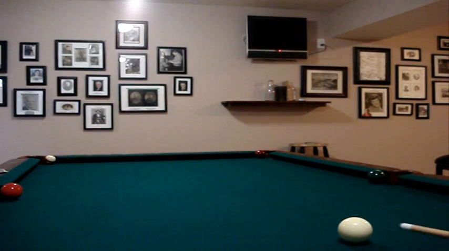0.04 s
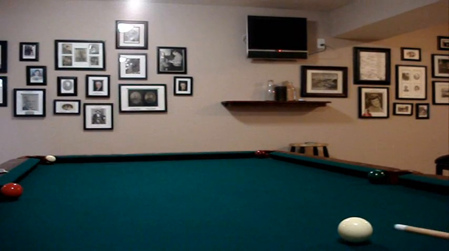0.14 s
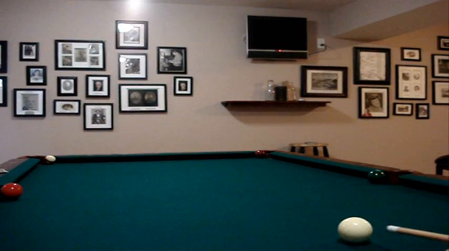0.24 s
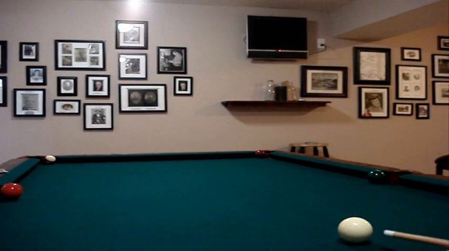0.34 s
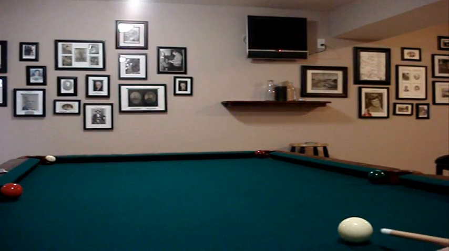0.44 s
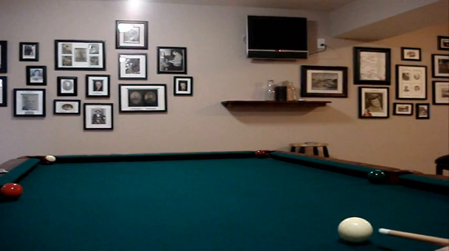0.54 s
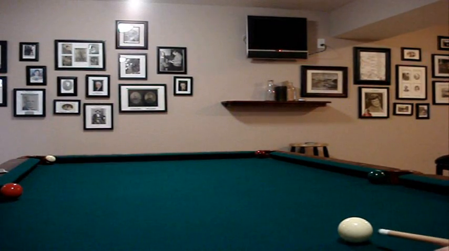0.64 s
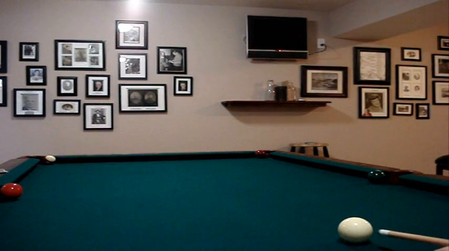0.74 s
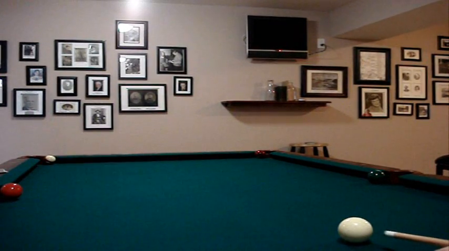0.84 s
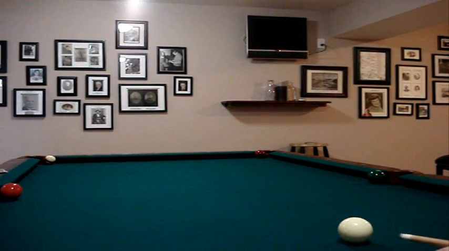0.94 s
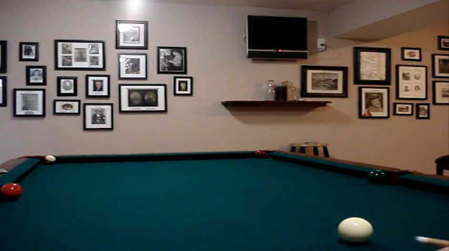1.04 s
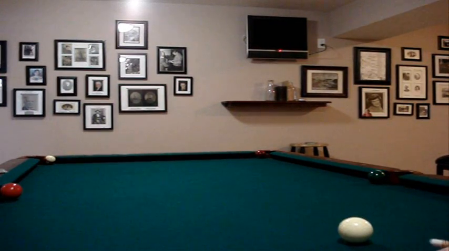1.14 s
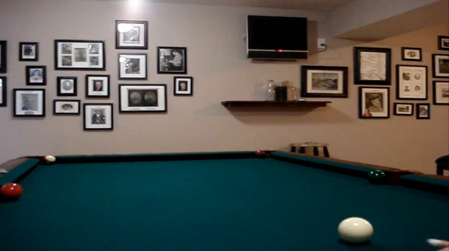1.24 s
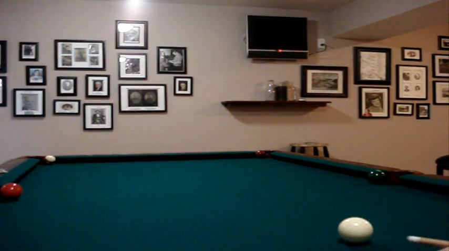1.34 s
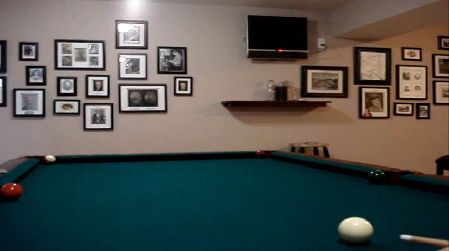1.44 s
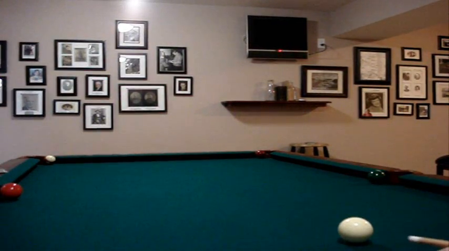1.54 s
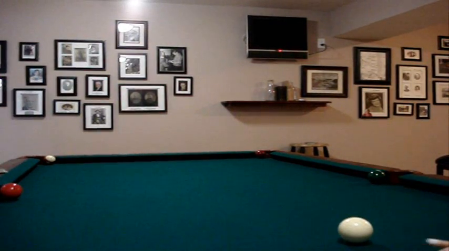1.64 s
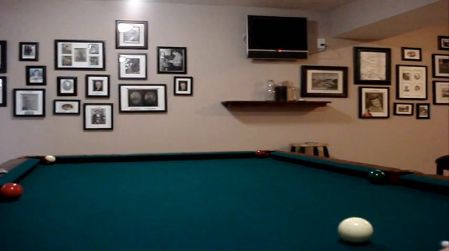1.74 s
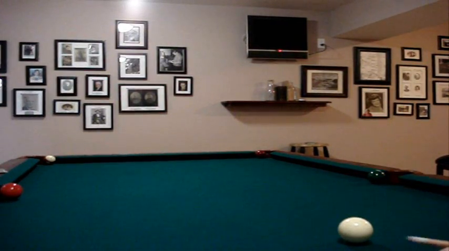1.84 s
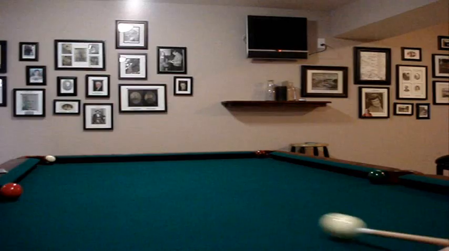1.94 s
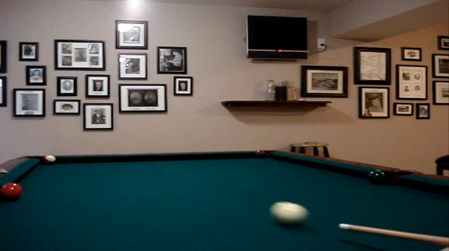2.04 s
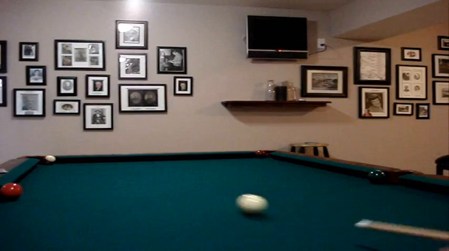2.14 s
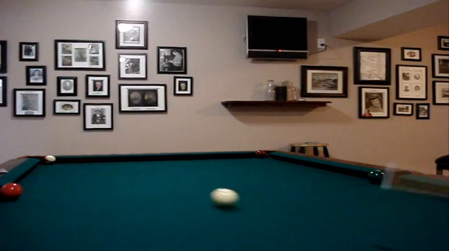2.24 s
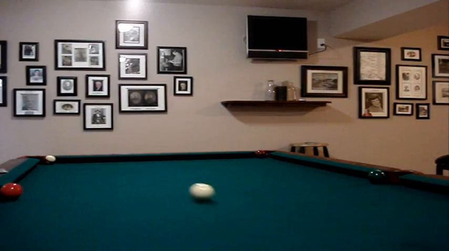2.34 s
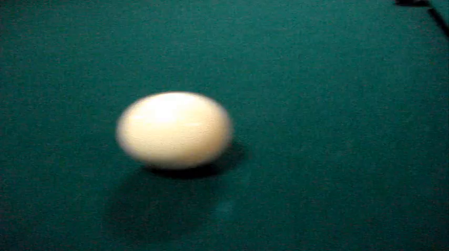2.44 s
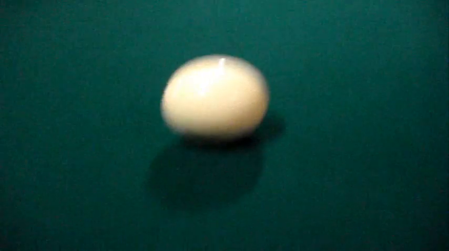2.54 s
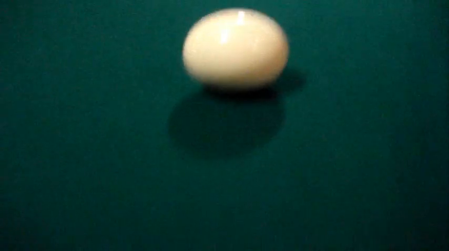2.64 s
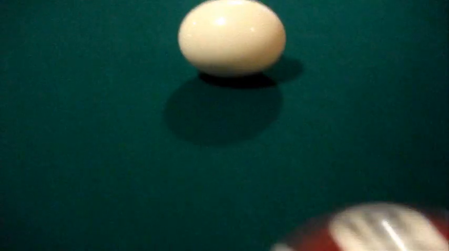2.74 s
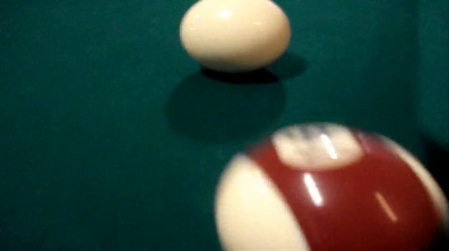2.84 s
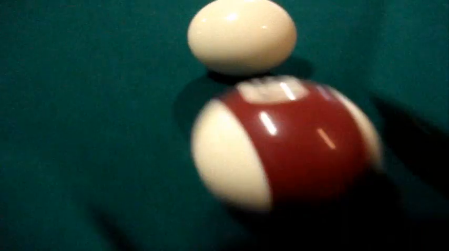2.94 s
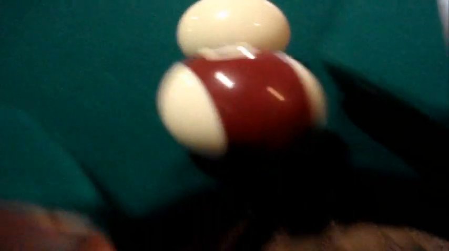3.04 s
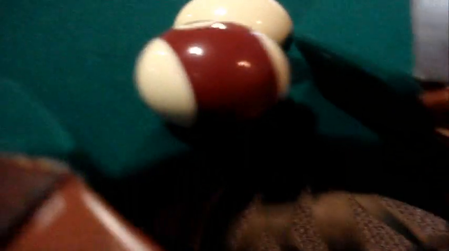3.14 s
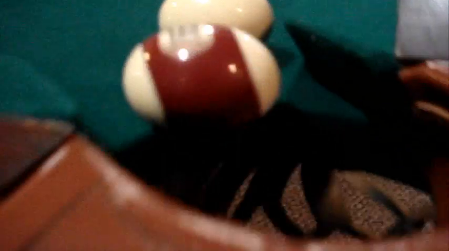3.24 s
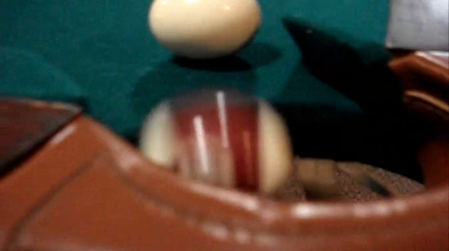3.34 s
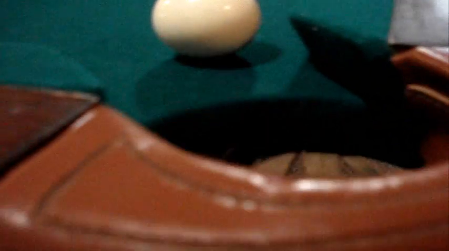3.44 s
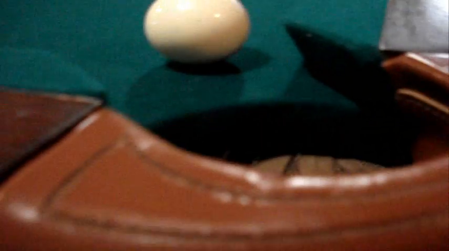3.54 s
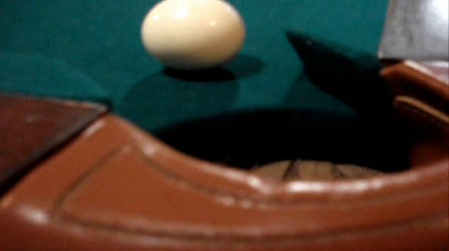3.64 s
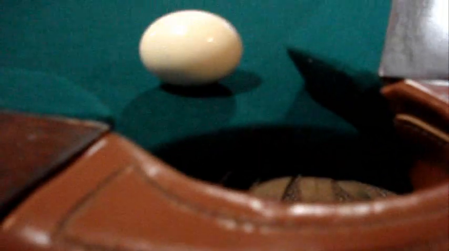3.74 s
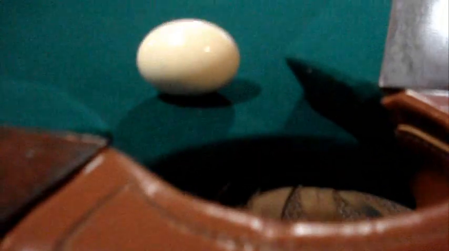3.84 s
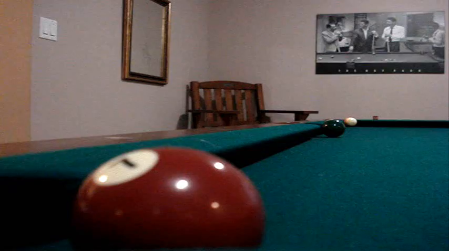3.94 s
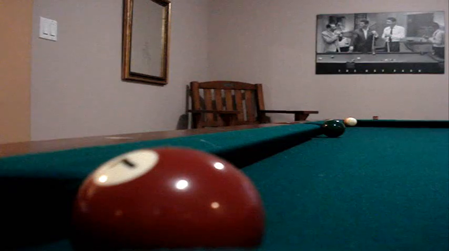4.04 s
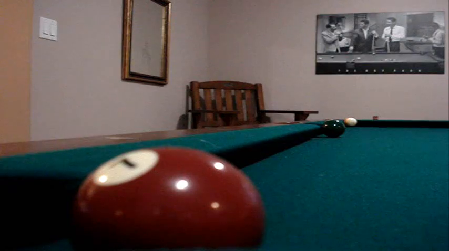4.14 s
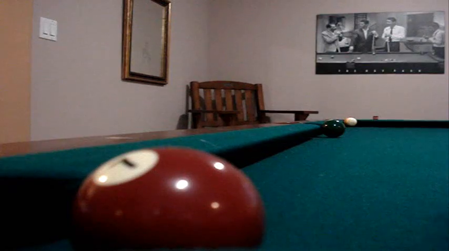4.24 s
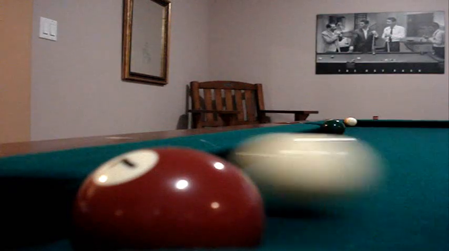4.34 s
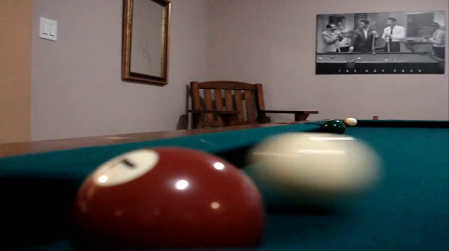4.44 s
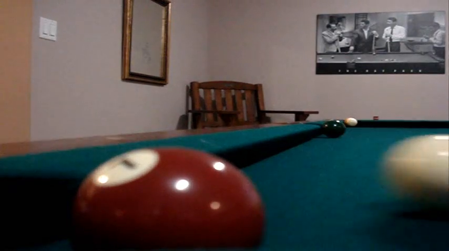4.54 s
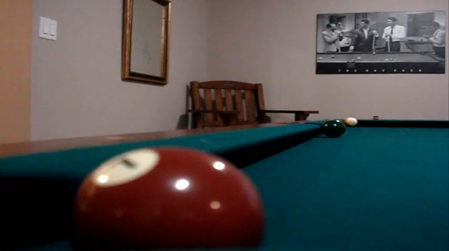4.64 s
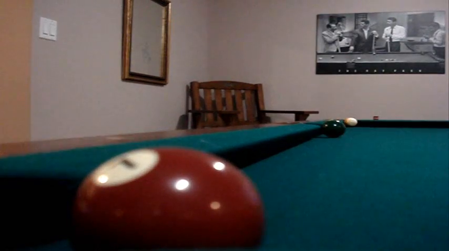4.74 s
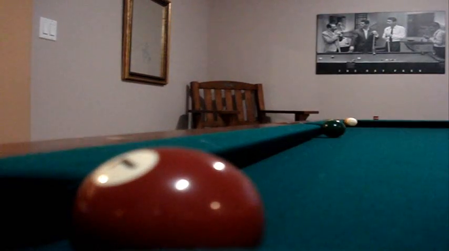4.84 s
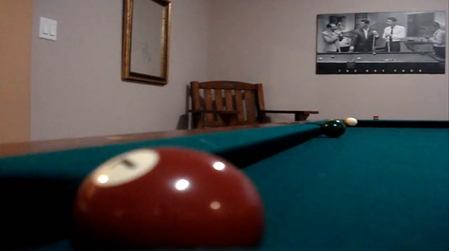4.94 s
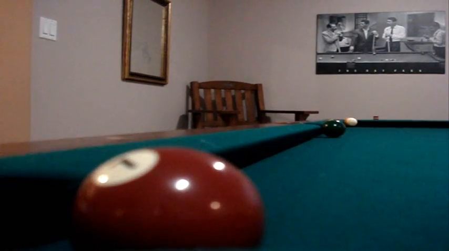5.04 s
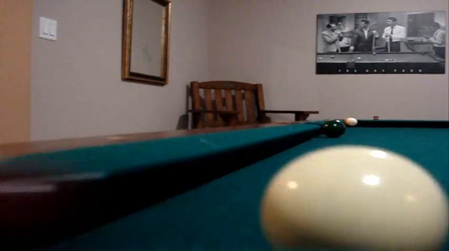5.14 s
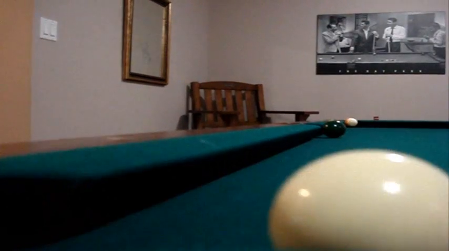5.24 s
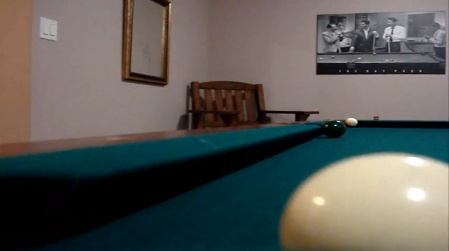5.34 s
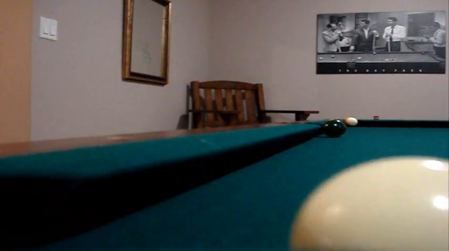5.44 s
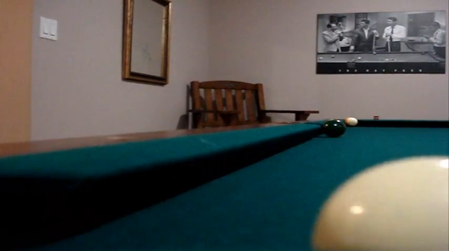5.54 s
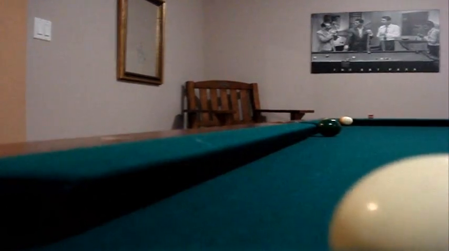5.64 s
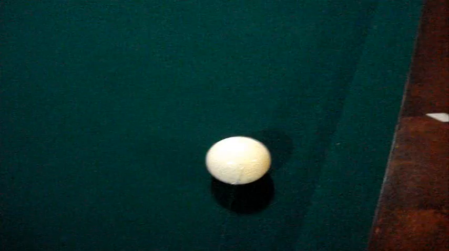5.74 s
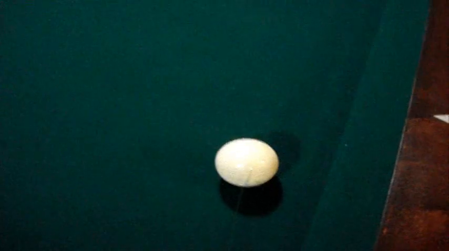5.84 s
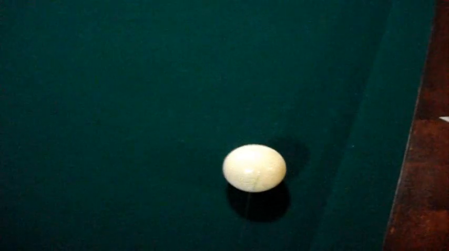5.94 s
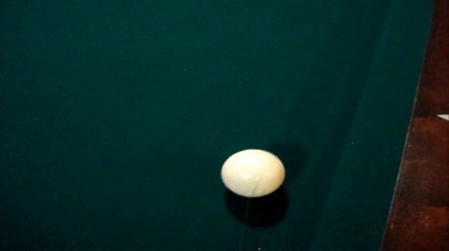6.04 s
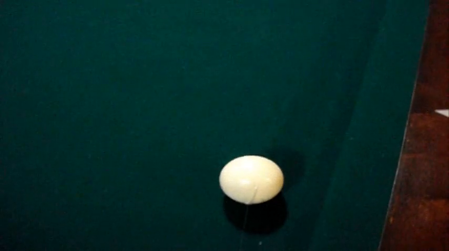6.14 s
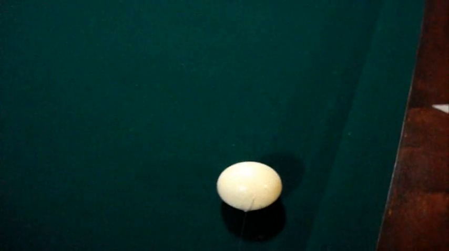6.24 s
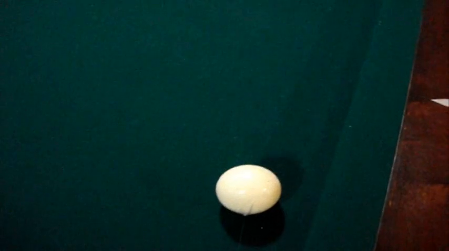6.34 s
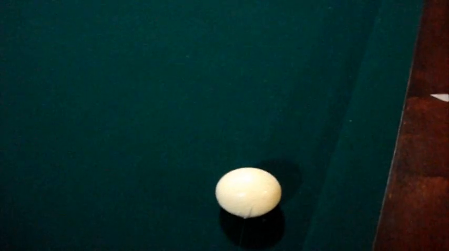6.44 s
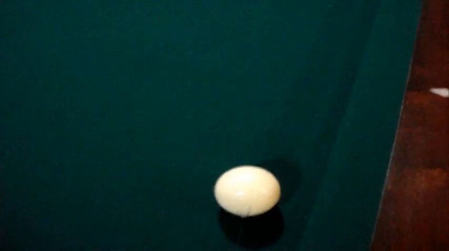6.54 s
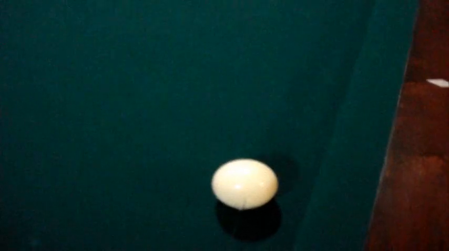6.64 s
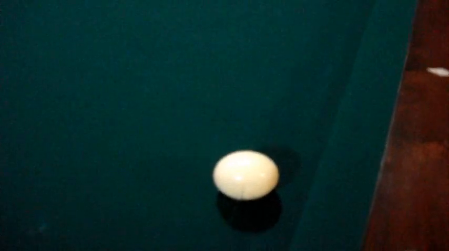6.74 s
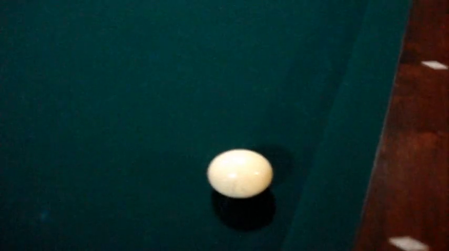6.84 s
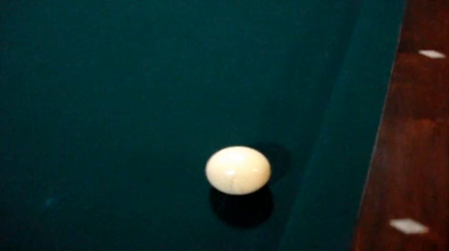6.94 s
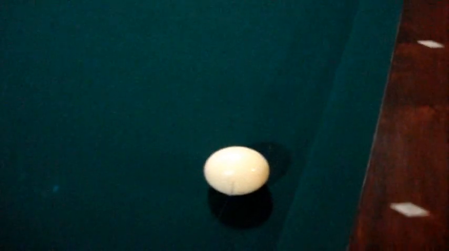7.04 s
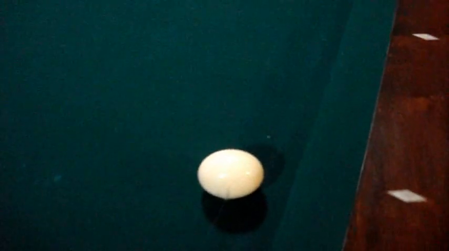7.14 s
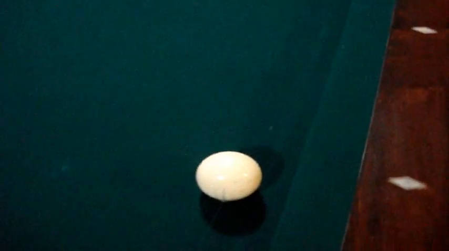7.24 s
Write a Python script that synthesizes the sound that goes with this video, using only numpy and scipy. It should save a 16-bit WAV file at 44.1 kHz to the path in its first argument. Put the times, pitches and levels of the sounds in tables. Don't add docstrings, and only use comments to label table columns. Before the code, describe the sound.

Constant soft camera hiss, low hum and thin whines fill a small room, with very faint button ticks at 0.2 and 1.4 s. At 2.05 s a cue strikes a ball with a hard woody knock, table boom and short echo; faint rolling follows. A brief dropout at 2.54 s changes the scene, with a small click at 2.8. At 3.27 balls clack loudly, then at 3.54 a ball drops into a leather pocket, rattling and chattering faster until 3.85. Close, thumping plastic handling snaps cluster at 3.86-3.97, with another cut at 4.04 and a click at 4.2. A softer distant cue hit comes at 4.5, with low rumble and dull cushion bumps near 5. Loud clacks and pocket knocks burst at 5.24-5.43. Sharp microphone clicks crowd 5.7-5.83. From about 6.05 to the end a ball rolls close by on crackling cloth, strongest near 6.6, its hollow whirring tone sinking.

```python
import sys
import numpy as np
from scipy import signal
from scipy.fft import rfft, irfft
from scipy.io import wavfile
from scipy.ndimage import uniform_filter1d, minimum_filter1d

SR = 44100
rng = np.random.default_rng(int(sys.argv[2]) if len(sys.argv) > 2 else 0)


def digitize_waveform(pressure):
    field = np.atleast_2d(pressure).T
    bounded = np.clip(field, -1, 1)
    quanta = np.round(bounded * 32767).astype(np.int16)
    wavfile.write(sys.argv[1], SR, quanta)


def convert_level_to_amplitude(level_db):
    exponent = np.asarray(level_db, float) / 20
    return 10 ** exponent


N = 321930

# frequency in Hz, density in dB per Hz.
FLOOR_SPECTRUM = [(15, -41), (30, -17), (74, -12.5), (119, -10.5), (200, -6.5), (340, -5.5), (640, -9),
                  (1800, -15.5), (4000, -20), (7900, -25), (9950, -29.5), (10100, -37.5), (12000, -37.5),
                  (15400, -33)]
# frequency in Hz, level in dB.
WHINES = [(4000, -66), (5001, -74), (6998, -91), (7590, -102), (7860, -81), (7892, -66), (8000, -75),
          (15003, -92)]
# start in seconds, level in dB.
HUM_LEVELS = [(0, -62.5), (2.54, -54), (3.54, -59), (4.04, -63.5), (5.6, -73)]
SHOT_GAPS = [2.5415, 4.042]

# start in seconds, peak in dB, shell pitch in Hz.
BUTTON_TICKS = [
    (.22, -35.5, 4500),
    (.32, -40, 4500),
    (1.41, -40, 7140),
    (2.77, -19, 2940),
    (4.194, -24.5, 3950),
]
LIGHT_TOUCHES = [(3.8589, -16.5, 2700), (5.6965, -6, 4230), (5.7274, -21, 3270), (5.7407, -22, 2290),
                 (5.749, -25, 2600), (5.7626, -22, 2500), (5.7706, -15, 2920), (5.783, -11, 2400),
                 (5.790, -6.5, 2780), (5.8248, -25, 2550), (5.8313, -10, 2470)]
FIRM_TOUCHES = [
    (3.89, -18, 2300),
    (5.775, -7, 2400),
]
HARD_TOUCHES = [
    (3.895, -8, 2610),
    (3.933, -4.5, 2360),
    (3.9692, -12.5, 2630),
]
RINGING_TOUCHES = [
    (3.859, -28, 1380),
    (3.876, -19.5, 1370),
    (3.9349, -15.5, 2480),
    (5.7002, -6.5, 2610),
]
RUSTLES = [
    (3.863, -25, 2600),
    (3.9, -25, 2400),
    (5.7968, -23.5, 2540),
]
# thump in dB, ring time in seconds, pure share of the ring, click in dB.
TOUCH_VOICES = [
    (-72, 0.02, 0.16, -15),
    (-52, 0.016, 0.53, -12),
    (-36, .017, 0.65, 2),
    (-23, 0.021, 0.24, 3.5),
    (-58, 0.018, 1.8, -40),
    (-60, .06, .05, -40),
]

# start in seconds, peak in dB, ring in Hz, ring length in cycles, room send in dB.
CUE_BLOWS = [
    (2.0478, -5, 645, 1.84, -26.5),
    (4.5037, -31, 446, 5.1, -16),
]
# frequency in Hz, level in dB, decay t60 in seconds.
CUE_SHAFT = [(1800, -22, 0.13), (2116, -25.5, .1), (1010, -20, 0.082)]
# frequency in Hz, level in dB, decay t60 in seconds.
TABLE_SLATE = [(150.2, -17.5, 0.6), (256, -10.5, 0.15), (536, 1.5, 0.057)]
# frequency in Hz, decay t60 in seconds.
ROOM_DECAY = [(100, 0.37), (400, 0.29), (1500, 0.27), (4000, 0.26), (8000, .18)]

# start in seconds, end in seconds, rumble in dB, swish in dB.
FAR_RUNS = [
    (2.197, 2.54, -57, -60),
    (2.547, 3.268, -59.5, -60),
    (4.29, 5.24, -53, -62),
]
# time in seconds, rumble in dB, swish in dB.
CUSHION_BUMPS = [
    (2.585, -53, -53),
    (4.85, -56, -75),
    (4.98, -44, -66),
    (5.13, -46, -64),
]

# start in seconds, peak in dB, ring in Hz, room send in dB.
BALL_CLACKS = [
    (3.2674, 1, 1800, -32),
    (3.2688, -4, 1910, -70),
    (5.041, -30, 1370, -41),
    (5.237, 2, 2400, -18),
    (5.367, -2.5, 1200, -26.5),
    (5.386, 3.5, 2080, -31),
    (5.407, 3.5, 2280, -30),
    (5.432, -6.5, 1810, -28.5),
    (6.085, -32, 1650, -21),
]

# start in seconds, level in dB, length in seconds, sag in dB per second.
POCKET_SPELLS = [
    [(3.541, -7.5, 0.034, 135), (3.58, -19, 0.145, 103)],
    [(5.236, -8, 0.039, 54), (5.283, -6.5, 0.1, 60), (5.41, -26.5, 0.2, 116)],
]
# frequency in Hz, density in dB per Hz.
POCKET_SPECTRA = [
    [(35, -47), (60, -11.5), (606, -18.5), (729, -3.5), (952, -12), (1520, -5.5), (1690, -1.5), (3320, -4),
     (4700, -17), (8000, -32), (10400, -63), (17600, -120)],
    [(35, -15), (60, -12), (302, -14.5), (387, -10), (582, -8), (932, -6.5), (1190, 0.5), (2300, -1),
     (3100, -6.5), (4300, -20), (8000, -36), (10400, -68), (17600, -120)],
]
POCKET_SINK = (0.27, 0.16)
POCKET_KNOCKS = (3000, 9000)
# start in seconds, peak in dB, ring in Hz.
POCKET_RATTLE = [
    (3.5419, 6, 1890),
    (3.609, -10, 1510),
    (3.637, -4, 1790),
    (3.683, -9.5, 1580),
    (3.696, -10, 1650),
    (3.7151, -21, 1470),
    (3.727, -18, 1600),
    (3.737, -24, 1460),
]
# start in seconds, first gap in seconds, last gap in seconds, ring in Hz.
POCKET_CHATTER = (3.7475, .0051, .00236, 1600)
# frequency in Hz, level in dB, decay t60 in seconds.
LEATHER_CUP = [(794, -18, 0.12), (410, -29, 0.048)]

# time in seconds, cloth hiss in dB.
ROLL_NEARNESS = [(5.98, -65), (6.1, -46.5), (6.22, -39.5), (6.52, -34.5), (6.68, -32.5), (6.87, -39),
                 (7.3, -38)]
# frequency in Hz, density in dB per Hz.
CLOTH_SPECTRUM = [(1120, -17.5), (1900, -2), (2500, -3), (3190, -1.5), (3550, -6), (3990, -2.5), (4910, 2),
                  (5690, -8.5), (6170, -7), (8530, -26), (9500, -23), (12400, -27), (20900, -120)]
# time in seconds, extra level in dB.
ROUGH_PATCHES = [
    (6.096, 4.5),
    (6.222, 2),
    (6.568, 4),
    (6.67, 5.0),
    (7.112, 3.5),
    (7.24, 1.5),
]

CLOCK_HZ = (12000, 8000)
CLOCK_FOLD_DB = (-23.5, -31.5)


def rms_one(x):
    return x / np.sqrt(np.mean(x ** 2) + 1e-20)


def colour(x, points):
    hz = np.arange(len(x) // 2 + 1) * SR / len(x) + 1
    point_hz, point_db = np.transpose(points)
    gain = convert_level_to_amplitude(np.interp(np.log(hz), np.log(point_hz), point_db))
    return irfft(rfft(x) * gain, len(x))


def band(x, low_hz, high_hz):
    return signal.sosfilt(signal.butter(2, [low_hz, high_hz], "band", fs=SR, output="sos"), x)


def smooth(x, order, hz):
    return signal.sosfilt(signal.butter(order, hz, fs=SR, output="sos"), x)


def drift(rate):
    knots = rng.standard_normal(400)
    return np.interp(np.arange(N) / SR * rate, np.arange(400), knots)


def bell(s, width_s):
    return np.exp(-((np.arange(N) / SR - s) / width_s) ** 2)


def add(out, s, sound):
    at = round(s * SR)
    out[at:at + len(sound)] += sound[:N - at]


def modes(table):
    t = np.arange(12000) / SR
    return sum(convert_level_to_amplitude(db - 60 * t / t60) * np.sin(2 * np.pi * hz * t) for hz, db, t60 in table)


def floor():
    t = np.arange(N) / SR
    hiss = rms_one(colour(rng.standard_normal(N), FLOOR_SPECTRUM))
    hiss = hiss * convert_level_to_amplitude(-50.5 + 0.071 * drift(11.0))
    whine = sum(convert_level_to_amplitude(db - 7) * np.sin(2 * np.pi * hz * t) for hz, db in WHINES)
    start_s, place_db = np.transpose(HUM_LEVELS)
    hum_db = uniform_filter1d(place_db[np.searchsorted(start_s[1:], t)], size=800)
    hum = convert_level_to_amplitude(hum_db + 2.0 * drift(4.17)) * np.sin(2 * np.pi * 122 * t)
    return hiss + whine + hum


def buttons():
    out, t = np.zeros(N), np.arange(2600) / SR
    push = t / 0.0021 * np.exp(1 - t / 0.0015)
    push = push - 0.1 * t / 0.045 * np.exp(1 - t / 0.032)
    click = 1.9 * np.sin(2 * np.pi * 3200 * t) * np.exp(-t / 0.000073)
    kinds = (BUTTON_TICKS, LIGHT_TOUCHES, FIRM_TOUCHES, HARD_TOUCHES, RINGING_TOUCHES, RUSTLES)
    for rows, (thump_db, ring_s, pure, click_db) in zip(kinds, TOUCH_VOICES):
        tame = max(pure, 1)
        for s, db, hz in rows:
            noise = rng.standard_normal((2, 2600))
            snap = band(noise[0], 450, 7500)
            snap = snap * (0.7 * np.exp(-t / 0.0006) + 0.15 * np.exp(-t / 0.003))
            shell = pure * np.sin(2 * np.pi * hz * t) + band(noise[1], 0.72 * hz, 1.56 * hz)
            shell = 0.74 / tame * shell * convert_level_to_amplitude(-60 * t / ring_s)
            body = (snap / tame ** 2 + shell) * (1 - np.exp(-t / 0.0003))
            touch = convert_level_to_amplitude(db) * (body + convert_level_to_amplitude(click_db) * click) + convert_level_to_amplitude(thump_db + 2.5) * push
            add(out, s + 0.00079, touch)
    return out


def knock(hz, cycles, bright_db, push_db):
    t = np.arange(1024) / SR
    swell = 1 - np.exp(-(t * hz * 2.25) ** 2)
    decay = np.exp(-np.log(1000) * t * hz / cycles)
    ring = -np.sin(2 * np.pi * hz * t - 1.2) * swell * decay
    tick = band(rng.standard_normal(1024) * np.exp(-t / 0.0077), 1500, 3600)
    push = band(t / 0.00026 * np.exp(1 - t / 0.00028), 106, 2960)
    return ring / np.abs(ring).max() + convert_level_to_amplitude(bright_db) * tick - convert_level_to_amplitude(push_db) * push


def strike(near, far, s, db, hz, cycles, room_db, bright_db, push_db=-17, low_hz=30):
    direct = knock(hz, cycles, bright_db, push_db)
    add(near, s + 0.0007, convert_level_to_amplitude(db) * band(direct, low_hz, 16000))
    blunt = knock(hz, 0.52 * cycles, bright_db + 4.0, -44)
    add(far, s, convert_level_to_amplitude(db + room_db + 5.5) * band(blunt, hz / 3.9, 3000))


def cue_blows():
    near, far = np.zeros(N), np.zeros(N)
    for (s, db, hz, cycles, room_db), slate_db in zip(CUE_BLOWS, (-12, 0.1)):
        strike(near, far, s, db, hz, cycles, room_db, bright_db=-17, push_db=-50, low_hz=170)
        add(near, s, convert_level_to_amplitude(db + slate_db) * band(modes(TABLE_SLATE), 120, 4400))
    t = np.arange(12000) / SR
    beating = 1 + 0.37 * np.cos(2 * np.pi * 65 * t)
    add(near, CUE_BLOWS[0][0] + 0.000903, modes(CUE_SHAFT) * beating)
    return near, far


def room(x):
    t, tail = np.arange(SR) / SR, 0
    echoes = rng.standard_normal(SR) * (rng.random(SR) < 0.03 + 3.0 * t)
    echoes = echoes * np.clip((t - 0.004) / 0.0064, 0, 1)
    decay_hz, decay_s = np.transpose(ROOM_DECAY)
    edges = 70 * 2 ** np.arange(0, 7.6, 0.5)
    for low, high in zip(edges, edges[1:]):
        t60 = np.interp(np.log(low), np.log(decay_hz), decay_s)
        tail = tail + min(low / 200, 1) * band(echoes, low, high) * convert_level_to_amplitude(-60 * t / t60)
    return signal.fftconvolve(x, tail / np.sqrt(np.sum(tail ** 2)) * 10)[:N]


def rumble():
    low = rms_one(band(rng.standard_normal(N), 81, 270))
    swish = rms_one(band(rng.standard_normal(N), 600, 3100))
    t, out = np.arange(N) / SR, np.zeros(N)
    for start, end, low_db, swish_db in FAR_RUNS:
        out += ((t > start) & (t < end)) * (convert_level_to_amplitude(low_db) * low + convert_level_to_amplitude(swish_db) * swish)
    for s, low_db, swish_db in CUSHION_BUMPS:
        out += bell(s, 0.027) * (convert_level_to_amplitude(low_db) * low + convert_level_to_amplitude(swish_db) * swish)
    return out


def ball_clacks():
    near, far = np.zeros(N), np.zeros(N)
    for s, db, hz, room_db in BALL_CLACKS:
        strike(near, far, s, db, hz, 8.1, room_db, bright_db=-25)
    return near, far


def tumble():
    sizes = convert_level_to_amplitude(3.25 * np.minimum(rng.exponential(1, N), 4)) * rng.choice([-1, 1], N)
    chance, out, t = rng.random(N), np.zeros(N), np.arange(N) / SR
    for spells, spectrum, sink_s, rate in zip(POCKET_SPELLS, POCKET_SPECTRA, POCKET_SINK, POCKET_KNOCKS):
        level = np.zeros(N)
        for s, db, length, sag in spells:
            rise = np.clip((t - s) / 0.0012, 0, 1)
            stop_db = 700 * np.maximum(t - s - length, 0)
            level += rise * convert_level_to_amplitude(db - sag * np.maximum(t - s, 0) - stop_db)
        bright = rms_one(colour(sizes * (chance < rate / SR), spectrum))
        dull = rms_one(band(bright, 220, 1000))
        sunk = np.clip((t - spells[0][0]) / sink_s, 0, 1) ** 2
        out += level * (bright + sunk * (dull - bright))
    return out


def pocket_rattle():
    near, far = np.zeros(N), np.zeros(N)
    for s, db, hz in POCKET_RATTLE:
        strike(near, far, s, db, hz, 6.0, room_db=-38.5, bright_db=-24)
    damping = np.exp(-np.arange(12000) / SR / 0.004)
    for s, db, _ in POCKET_RATTLE[2:]:
        add(near, s + 0.0009, convert_level_to_amplitude(db + 4.5) * modes(LEATHER_CUP) * damping)
    return near, far


def pocket_chatter():
    near, far = np.zeros(N), np.zeros(N)
    s, first, last, hz = POCKET_CHATTER
    for k in range(24):
        touch_db = -14 - 1.8 * max(k - 8, 0) + rng.normal(0, 1)
        touch = -convert_level_to_amplitude(touch_db) * knock(hz, 5.5, -27, -51)
        add(near, s, touch)
        add(near, s, np.abs(touch).max() * rng.choice([-1, 1]) * modes(LEATHER_CUP))
        add(far, s, convert_level_to_amplitude(-25.5) * band(touch, 430, 1400))
        s += last + (first - last) * 0.5 ** k + 0.00009 * max(k - 7, 0)
    return near, far


def roll():
    t = np.arange(N) / SR
    grain = rng.standard_normal((2, N)) * convert_level_to_amplitude(2.0 * np.minimum(rng.exponential(1, (2, N)), 3))

    end_hz, top_hz = 1032, 1630
    hollow_hz = end_hz + (top_hz - end_hz) * np.exp(-np.maximum(t - 6.16, 0) / 0.66)
    phase = 2 * np.pi * np.cumsum(hollow_hz) / SR
    pure, narrow = smooth(grain, 2, 45), smooth(grain, 2, 110)
    wide = smooth(grain[::-1], 1, 300)
    opening = np.clip((t - 6.05) / 0.38, 0.15, 1)
    sides = opening * (narrow + 0.43 * wide) + 1.52 * (1 - opening) * pure
    hollow = sides[0] * np.sin(phase) + sides[1] * np.cos(phase)
    hollow = rms_one(band(hollow, 985, 1860))
    hollow_db = -37 - 3 * np.clip((6.084 - t) / 0.0051, 0, 1)
    hollow_db = hollow_db - 900 * np.maximum(6.05 - t, 0)
    hollow_db = hollow_db + sum(db * bell(s, 0.033) for s, db in ROUGH_PATCHES)

    hiss = rms_one(colour(grain[0], CLOTH_SPECTRUM)) * convert_level_to_amplitude(0.95 * drift(30))
    hiss_db = np.interp(t, *np.transpose(ROLL_NEARNESS))
    fade = np.clip((t - 5.95) / 0.058, 0, 1)
    return fade * (convert_level_to_amplitude(hollow_db) * hollow + convert_level_to_amplitude(hiss_db) * hiss)


def clock_fold(sound):
    t = np.arange(N) / SR
    rising = band(np.diff(sound, prepend=0) * 3.34, 350, 7100)
    clocks = sum(2 * convert_level_to_amplitude(db) * np.cos(2 * np.pi * hz * t) for hz, db in zip(CLOCK_HZ, CLOCK_FOLD_DB))
    return rising * clocks


def scene():
    contacts = (cue_blows(), ball_clacks(), pocket_rattle(), pocket_chatter())
    near = sum(direct for direct, _ in contacts)
    far = sum(sent for _, sent in contacts)
    pocket = tumble()
    sound = near + pocket + room(far + convert_level_to_amplitude(-34.5) * pocket) + roll() + rumble() + buttons()
    return (sound + clock_fold(sound) + floor())[None]


def swell_before_blows(x):
    early = rng.standard_normal(220) * np.exp(np.arange(-220, 0) / 97.0)
    power = uniform_filter1d(band(x, 1900, 16300) ** 2, size=128)
    level = np.sqrt(np.abs(power)) + 1e-7
    coming = -minimum_filter1d(-level, size=1000, origin=-499)
    jump_db = 20 * np.log10(coming / level)
    smear = signal.fftconvolve(x, early)[219:N + 219]
    smear = convert_level_to_amplitude(-30) * np.clip((jump_db - 8) / 4, 0, 1) * smear
    starved = uniform_filter1d(np.clip((jump_db - 25) / 6, 0, 0.75), size=64)
    treble = signal.sosfiltfilt(signal.butter(3, 1500, "high", fs=SR, output="sos"), x)
    return x + smear - starved * treble


def band_limit(x):
    return signal.sosfilt(signal.butter(12, 16470, fs=SR, output="sos"), x)


def record(dry):
    t = np.arange(N) / SR
    gate = np.prod([np.clip(np.abs(t - s) / 0.0015 - 1, 0.03, 1) for s in SHOT_GAPS], axis=0)
    ceiling = np.where(dry > 0, 0.85, 1)
    loud = dry * gate / (1 + np.abs(dry / ceiling) ** 4) ** (1 / 4)
    top_cut = signal.ellip(7, 0.5, 38, 15250, fs=SR, output="sos")
    mix = signal.sosfilt(top_cut, swell_before_blows(loud[0])[None])
    return band_limit(mix)


dry = scene()
out = record(dry)
digitize_waveform(out)
```